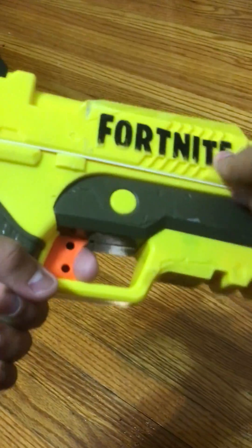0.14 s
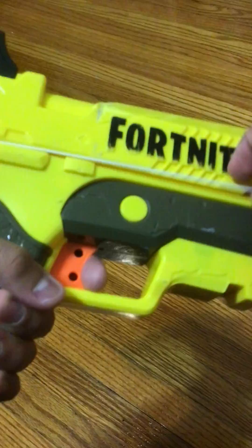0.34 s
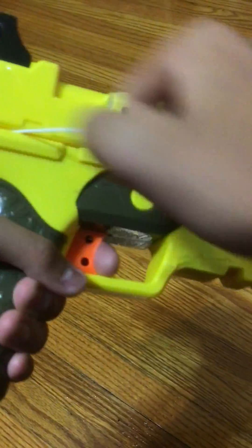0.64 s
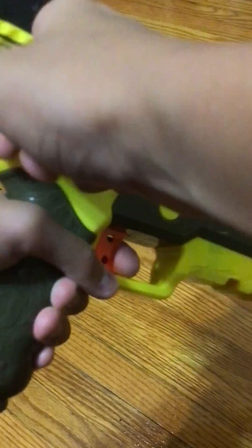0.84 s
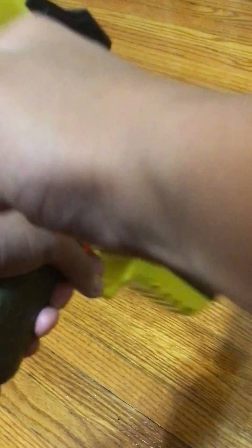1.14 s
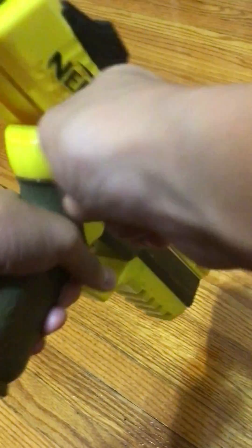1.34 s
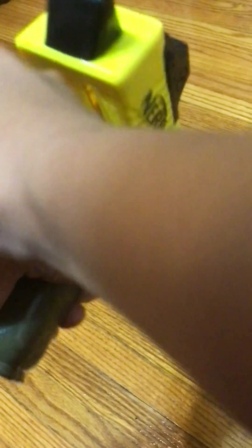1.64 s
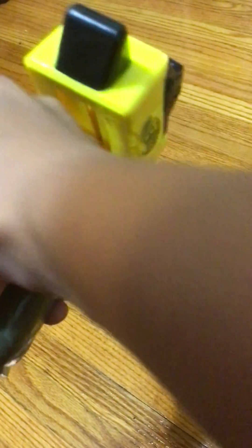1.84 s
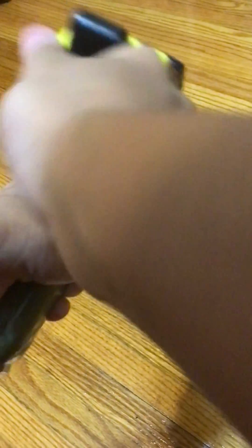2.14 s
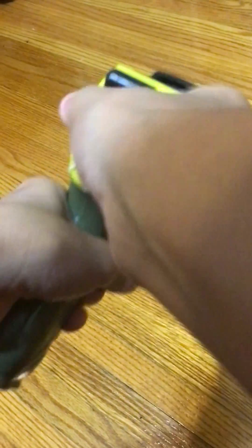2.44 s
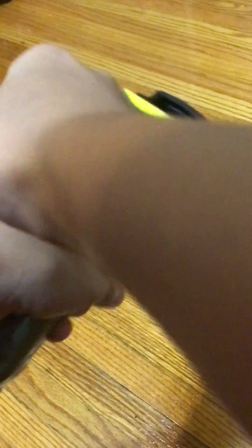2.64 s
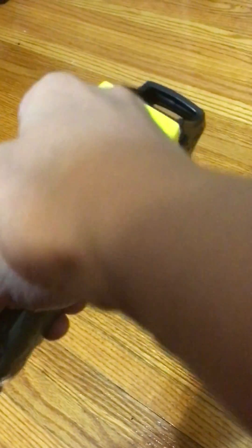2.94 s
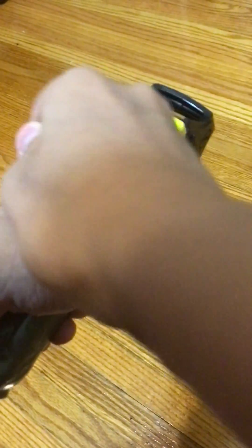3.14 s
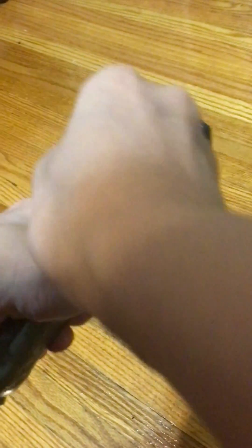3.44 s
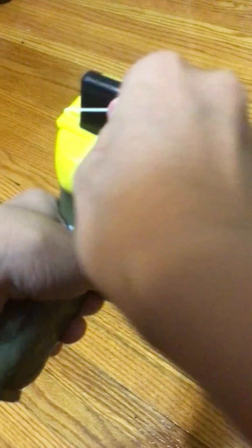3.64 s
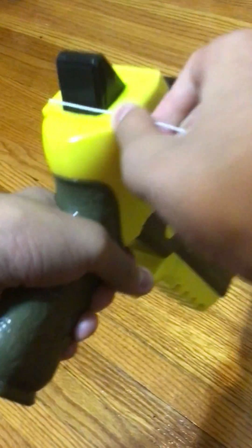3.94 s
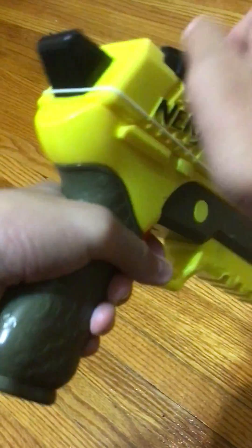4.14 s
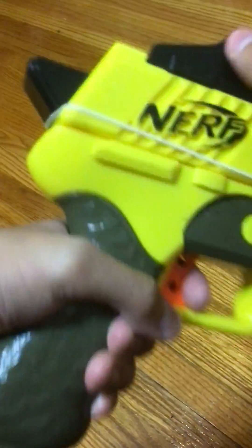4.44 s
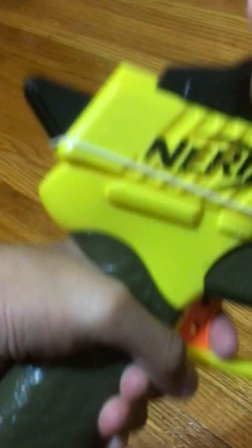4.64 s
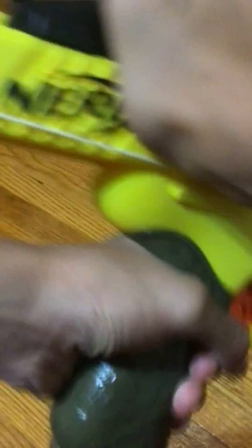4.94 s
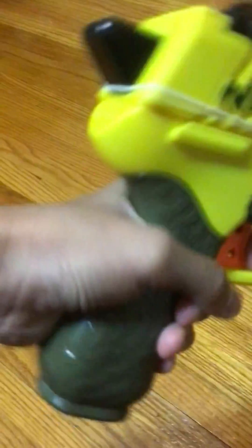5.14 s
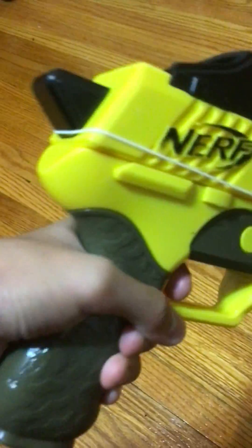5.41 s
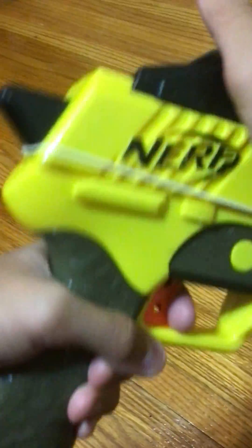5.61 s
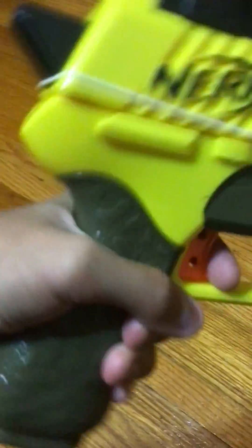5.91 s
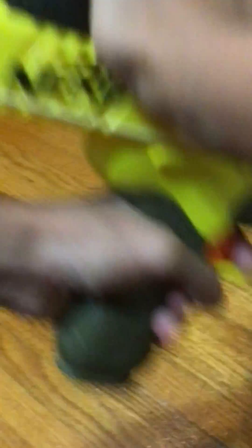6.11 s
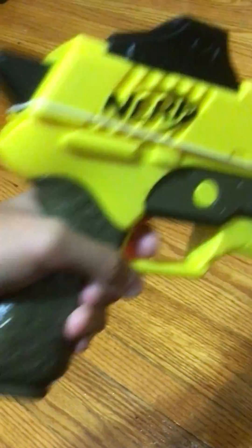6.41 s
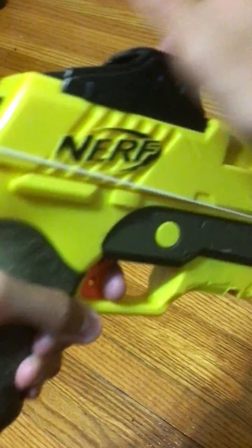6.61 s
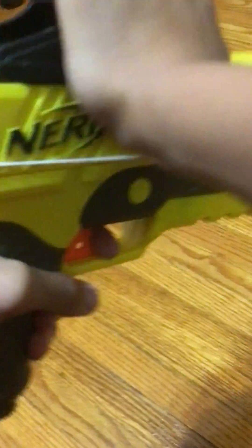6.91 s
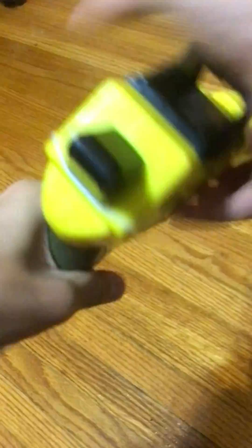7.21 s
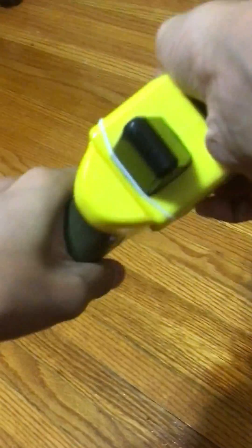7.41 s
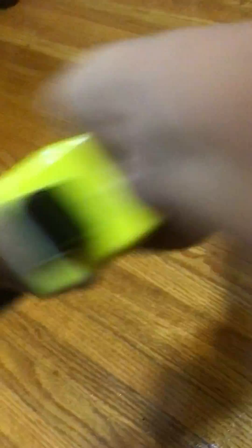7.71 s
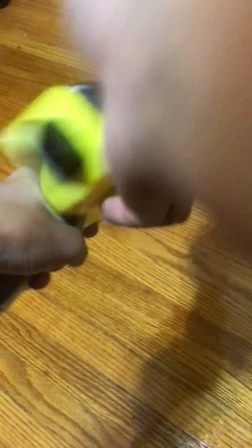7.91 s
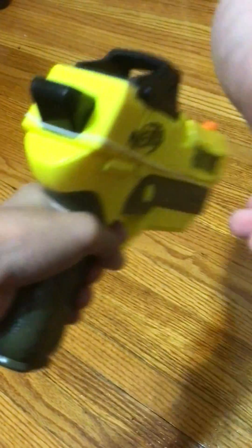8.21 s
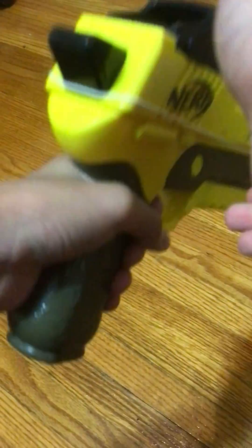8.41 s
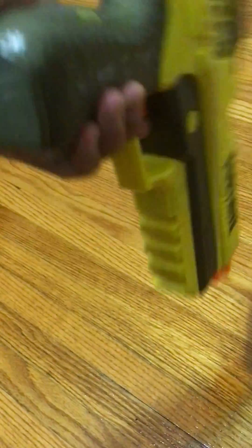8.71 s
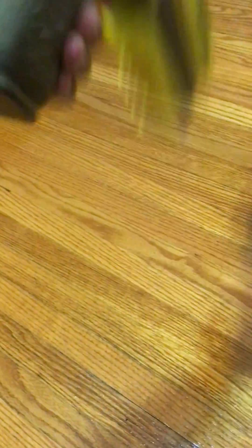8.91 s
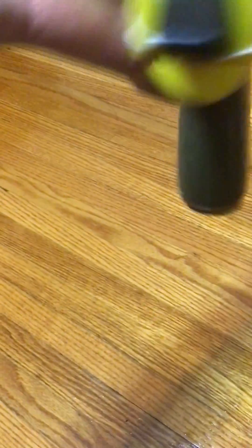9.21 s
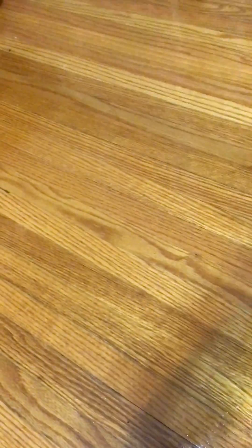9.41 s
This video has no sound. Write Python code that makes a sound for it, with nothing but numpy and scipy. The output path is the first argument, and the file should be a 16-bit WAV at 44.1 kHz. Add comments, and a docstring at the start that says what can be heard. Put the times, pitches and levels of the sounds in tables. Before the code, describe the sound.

Close to the microphone in a small room, a hollow plastic toy pistol is fidgeted with: faint ticks, finger rubs and creaks first. Then the slide is worked in quick scrapes ending in hard clacks, with a dry trigger snap and low hum after each cocking. The loudest burst is in the middle; at the end only small taps remain over faint rumble and hiss.

```python
"""A plastic toy pistol is handled, cocked and dry-fired close to a microphone in a small room.
Its hollow shell knocks at every catch and stop: noise bursts tick and clack over a swelling sine.
The slide scrapes along its rails and fingers rub the shell, both as coloured streams of tiny slips.
The plunger draws a falling tone from its air tube, the spring pings and each of four shots leaves a low hum.
Scattered reflections and a faint rumble with hiss surround it."""
import sys
import numpy as np
from scipy import signal
from scipy.io import wavfile
from scipy.ndimage import uniform_filter1d

SR = 44100
rng = np.random.default_rng(int(sys.argv[2]) if len(sys.argv) > 2 else 0)


def waveform_to_disk(signal):
    """Save audio, clipped to [-1, 1], as 16-bit WAV at the path in sys.argv[1]."""
    frames = np.transpose(np.atleast_2d(signal))
    scaled = np.clip(frames, -1, 1) * 32767
    samples = np.round(scaled).astype(np.int16)
    wavfile.write(sys.argv[1], SR, samples)


N = 421588

# Full strokes of the slide. Each row: start in seconds, stop in seconds, relative scrape level in dB,
# hiss against the body in dB, relative blow at the stop in dB, pitch of the shell in Hz,
# peak of the plunger tone in dB.
STROKES = [(2.304, 2.319, -27, -1, -13.5, 720, -42), (4.873, 4.9297, -22, 2.5, -12, 530, -21),
           (5.1, 5.1595, -20, -4, -6.5, 500, -16), (6.0, 6.0506, -24, 2, -11.5, 640, -21),
           (6.182, 6.2414, -20, -3.5, -9.5, 550, -22), (7.727, 7.7687, -22, 1, -12.5, 830, -34),
           (7.905, 7.9753, -26.5, -1, -8.5, 800, -17.5)]
# Dry shots. Each row: time in seconds, relative level in dB, pitch of the shell in Hz,
# flight of the plunger in seconds, relative hum level in dB.
SHOTS = [(2.8863, -8, 750, .0151, -16), (5.3872, -9, 640, .0229, -27), (6.4547, -11, 567, .0217, -24),
         (8.3589, -10, 720, .0225, -20)]
# Body of the plastic rubbing on its rails. Each row: frequency in Hz, relative level in dB.
RAIL = [(120, -33), (380, -16), (540, 1.5), (800, 0), (1100, -3), (1400, -5.5), (2000, -12), (4000, -21.5),
        (9000, -35.5)]
# Hiss of the scraping plastic. Each row: frequency in Hz, relative level in dB.
SCRAPE = [(800, -19), (1400, -1.5), (2400, 1.5), (4500, 0), (6500, -1), (8200, -4.5), (11000, -2.5),
          (15500, -9.5)]

# The plunger follows the stop of a stroke by this time; a thud precedes its tone by as much.
PLUNGER_LAG_S = .007


def amp(db):
    """Decibels to gain."""
    return 10 ** (np.asarray(db) / 20)


def unit(x):
    """Scales to an rms of one."""
    return x / np.sqrt(np.mean(x ** 2) + 1e-20)


def read(points, hz):
    """Reads a spectrum on a log-frequency axis."""
    f, value = np.transpose(points)
    return np.interp(np.log(hz + 1), np.log(f), value)


def add(mix, s, sound):
    """Mixes a sound in at s seconds."""
    part = mix[max(round(s * SR), 0):][:len(sound)]
    part += sound[:len(part)]


def impulse(points, size=2048):
    """Causal impulse response of unit energy with the given spectrum."""
    log_gain = np.log(amp(read(points, abs(np.fft.fftfreq(size, 1 / SR)))))
    # minimum phase puts the energy as early as the spectrum allows
    spectrum = np.exp(np.conj(signal.hilbert(log_gain)))
    h = np.fft.ifft(spectrum).real[:size // 2]
    return h / np.linalg.norm(h)


def colour(x, response):
    """Passes x through an impulse response."""
    return signal.oaconvolve(x, response)[:len(x)]


def swelling(t, swell):
    """Envelope that peaks at one after the swell time in seconds, then dies away."""
    return t / swell * np.exp(1 - t / swell)


def contact(t, decay=.003, rise=0.001, rattle_db=-15, rattle_decay=0.014, chatter_db=4):
    """Plastic on plastic: a burst of tiny impacts, then a fainter, uneven buzz of loose parts."""
    slow_noise = unit(uniform_filter1d(rng.standard_normal(len(t)), size=90))
    chatter = amp(chatter_db * slow_noise)
    rattle = amp(rattle_db) * np.exp(-t / rattle_decay) * chatter
    envelope = (1 - np.exp(-t / rise)) * (np.exp(-t / decay) + rattle)
    burst = envelope * rng.standard_normal(len(t))
    # every burst carries the energy of its envelope
    return burst * np.linalg.norm(envelope) / np.linalg.norm(burst)


def friction(slips_per_s, spread_db, smooth):
    """Tiny slips of very unequal size over a smooth hiss."""
    at = np.flatnonzero(rng.random(N) < slips_per_s / SR)
    hiss, slips = rng.standard_normal(N), np.zeros(N)
    size_db = spread_db * np.minimum(rng.exponential(1, N)[at], 4)
    slips[at] = np.sign(hiss[at]) * amp(size_db)
    return unit(unit(slips) + smooth * hiss)


def clicks(tick_db=0.77, clack_db=0.12, shell_db=-3.5, knock_db=-3.3, swell=0.0027, shell_hz=660, follow=.6):
    """Each contact ticks, clacks in the stiff walls and knocks in the hollow shell."""
    # Colours of the sharp tick, the wall clack and the shell, the last as it is for a knock at shell_hz.
    # Each row: frequency in Hz, relative level in dB.
    tick_colour = [(1500, -23.5), (3000, -10), (4000, 1), (5500, 0.5), (6800, 0.5), (8200, -3.5),
                   (10600, 3), (12500, -4), (14000, -1), (15500, -12)]
    clack_colour = [(300, -31), (700, -8), (1100, -3.5), (1380, 5), (1750, 0.5), (2050, 0), (2400, 1),
                    (3100, -5), (4000, -6), (6500, -19)]
    shell_colour = [(100, -31.5), (200, -10.5), (320, -9.5), (420, -6.5), (530, 1.5), (640, -1.5),
                    (760, 0.5), (1000, -8), (1400, -16.5), (3000, -38)]

    ticks, clacks, knocks = np.zeros((3, N))
    t = np.arange(SR // 20) / SR
    for s, high_db, mid_db, low_db, hz in contacts():
        add(ticks, s, amp(high_db + tick_db) * contact(t, decay=0.0024))
        add(clacks, s, amp(mid_db + clack_db) * contact(t, decay=0.0032))
        # the pitch of the shell depends on the grip and on where the slide stands
        shell = impulse(np.array(shell_colour) * [(hz / shell_hz) ** follow, 1])
        hollow = amp(shell_db) * colour(contact(t, decay=.005), shell)
        # its main resonance needs a cycle or two to swell
        ring = amp(knock_db) * swelling(t, swell) * np.sin(2 * np.pi * hz * t)
        add(knocks, s, amp(low_db) * (hollow + ring))
    return colour(ticks, impulse(tick_colour)) + colour(clacks, impulse(clack_colour)) + knocks


def contacts():
    """Every meeting of plastic parts, as (s, tick dB, clack dB, knock dB, pitch Hz), levels relative."""
    # Single catches and knocks of the parts. Each row: time in seconds, relative tick level in dB,
    # relative clack level in dB, relative knock of the shell in dB, pitch of that knock in Hz.
    blows = [(0.011, -43.5, -44, -39, 650), (0.054, -37.0, -42.5, -41.5, 515),
             (0.1146, -27.5, -34.5, -40.0, 1055), (0.233, -49.5, -46.0, -47.5, 720),
             (0.331, -47.5, -45.0, -34.5, 690), (0.346, -51, -47, -42, 665),
             (0.444, -33.0, -39, -38.5, 565), (0.587, -21.0, -26, -37.0, 1250),
             (0.687, -34.5, -38.0, -42.5, 695), (0.706, -34.5, -37.5, -46.0, 885),
             (0.774, -57, -50, -41, 1055), (0.924, -42.0, -48.5, -51.0, 594),
             (0.9574, -25.5, -32.0, -38.5, 616), (1.064, -64.0, -41.5, -40.5, 515),
             (1.099, -64.0, -50.0, -40.0, 560), (1.256, -42, -53, -58, 835),
             (1.297, -44.0, -46.5, -46.5, 560), (1.329, -51.0, -40.5, -33.0, 1035),
             (1.3733, -37.5, -40.5, -37.0, 755), (1.389, -49.0, -35.5, -32.5, 1030),
             (1.4506, -35.5, -38.5, -34.5, 1045), (1.491, -52.5, -49.5, -37.5, 1045),
             (1.532, -36.5, -36.5, -32.0, 750), (1.699, -37.5, -42.0, -31.0, 770),
             (1.719, -44.5, -35.5, -27.0, 755), (1.899, -37.5, -54.5, -50.5, 955),
             (1.9395, -34.0, -41.0, -34.0, 995), (2.003, -39.0, -37.0, -30.0, 1095),
             (2.082, -26.0, -25.0, -25.0, 1115), (2.107, -47.0, -40.0, -28.5, 1000),
             (2.15, -33.5, -34.0, -26.5, 650), (2.213, -46.0, -36.5, -32.0, 580),
             (2.2957, -20.5, -22.5, -23.5, 830), (2.334, -25.0, -23.5, -24.5, 640),
             (2.507, -26.0, -28.5, -26.0, 575), (2.776, -46.5, -46.0, -36.0, 510),
             (2.8185, -40.5, -39.5, -49.5, 1265), (3.222, -44.0, -47.0, -60.0, 640),
             (3.385, -42.5, -40.5, -49.0, 835), (3.4516, -45.5, -30.0, -31.5, 575),
             (3.568, -55.5, -36.5, -41.0, 905), (4.041, -51.0, -47.0, -43.0, 616),
             (4.0886, -17.0, -24.0, -32.0, 850), (4.125, -23.0, -27.0, -23.0, 825),
             (4.1654, -27.0, -31.5, -40.5, 560), (4.2916, -27.0, -35.0, -37.0, 480),
             (4.3505, -54.0, -34.0, -30.0, 450), (4.397, -28.0, -37.5, -33.5, 520),
             (4.4707, -38.0, -55.5, -49.0, 610), (4.549, -30.5, -39.5, -43.0, 720),
             (4.569, -19.5, -24.5, -18.0, 520), (4.7247, -39.5, -31.0, -33.0, 545),
             (4.7785, -25.0, -30.5, -31.0, 795), (4.7885, -21.0, -19.0, -10.0, 585),
             (4.8135, -31.5, -40.0, -32.0, 605), (4.868, -27.5, -32.5, -35.0, 715),
             (4.8888, -14.0, -17.0, -15.0, 545), (4.9087, -11.0, -17.5, -14.5, 575),
             (4.9424, -18.0, -22.5, -17.5, 710), (5.031, -30.0, -35.0, -29.0, 980),
             (5.102, -23.0, -22.0, -21.0, 1005), (5.6506, -37.0, -46.5, -48.5, 530),
             (5.7174, -24.0, -20.0, -17.0, 605), (5.9045, -32.0, -39.5, -36.5, 505),
             (5.9215, -22.0, -25.0, -14.5, 630), (6.0097, -18.5, -26.0, -21.5, 590),
             (6.0302, -12.5, -16.0, -15.0, 530), (6.0624, -16.0, -24.5, -13.0, 960),
             (6.0911, -22.5, -23.0, -15.0, 820), (6.1674, -32.5, -34.0, -37.5, 725),
             (6.7655, -32.5, -37.5, -43.0, 465), (6.8234, -23.5, -26.5, -22.5, 750),
             (6.931, -40.0, -55.0, -63.5, 725), (6.994, -49.5, -44.5, -34.0, 535),
             (7.043, -42.5, -40.5, -34.5, 535), (7.226, -49.0, -38.5, -39.0, 540),
             (7.3317, -18.0, -16.0, -11.5, 570), (7.578, -52.5, -40.0, -44.5, 680),
             (7.647, -30.5, -27.0, -28.0, 530), (7.7154, -20.0, -20.0, -23.5, 850),
             (7.7348, -17.5, -15.0, -20.5, 850), (7.941, -23.0, -22.0, -14.5, 1035),
             (8.5864, -42.0, -44.5, -51.0, 485), (8.7276, -36.5, -34.5, -37.5, 635),
             (8.738, -39, -46, -43, 500), (8.8568, -28.0, -36.0, -43.0, 560),
             (8.977, -43.5, -50.5, -50.5, 650), (9.122, -45.0, -49.0, -49.5, 515),
             (9.3696, -41.5, -34.5, -47.0, 710), (9.4185, -33.0, -40.0, -41.0, 515),
             (9.4314, -39.0, -36.0, -29.0, 490), (9.507, -35.5, -43.5, -40.0, 695),
             (9.5407, -24.5, -32.5, -26.5, 1025)]
    return list(blows) + stop_contacts() + shot_contacts() + grip_taps()


def stop_contacts(latch_s=.0085, latch_db=-2.5, latch_knock_db=-9, clack_db=-3.5, stop_knock_db=-4):
    """A light latch snaps with little knock just before the slide hits its stop."""
    rows = []
    for _, stop, _, _, db, hz, _ in STROKES:
        latch = (stop - latch_s, db + latch_db, latch_knock_db)
        for s, level, knock_db in latch, (stop, db, stop_knock_db):
            rows.append((s, level, level + clack_db, level + knock_db, hz))
    return rows


def shot_contacts(clack_db=-4.5, knock_db=0, rebound_s=.0065, rebound_db=-5.5, landing_db=-2, landing_hz=560):
    """In every shot the catch lets go and rebounds, then the plunger lands with a knock at landing_hz."""
    rows = []
    for s, db, hz, flight, _ in SHOTS:
        release = (0, db, hz)
        rebound = (rebound_s, db + rebound_db, hz)
        landing = (flight, db + landing_db, landing_hz)
        for delay, level, pitch in release, rebound, landing:
            rows.append((s + delay, level, level + clack_db, level + knock_db, pitch))
    return rows


def grip_taps(taps_per_s=9, tick_db=-2, clack_db=-1, knock_db=5, spread_db=8, low_hz=480, high_hz=1100):
    """The shifting grip gives faint taps at random times, louder where the fingers press harder."""
    rows = []
    count = round(taps_per_s * N / SR)
    for when, sharpness, force, place in rng.random(size=(300, 4))[:count]:
        s = when * N / SR
        db = pressure_db(s) + spread_db * force
        tick = db + tick_db - spread_db * sharpness
        rows.append((s, tick, db + clack_db, db + knock_db, low_hz + (high_hz - low_hz) * place))
    return rows


def slide(speed_up_db=8, overrun_s=.004):
    """The slide grinds along its rails, harder as it gathers speed, and overruns the stop a little."""
    # Other short scrapes, before a catch, after a stop or during handling. Each row: start in seconds,
    # end in seconds, relative scrape level in dB, hiss against the body in dB.
    short_scrapes = [(.96, .992, -43, 0), (1.942, 1.968, -44, 1), (2.077, 2.318, -39, -7.5),
                     (2.322, 2.342, -25, -3), (4.561, 4.592, -32, -1), (4.93, 4.975, -27, -3),
                     (5.676, 5.726, -36, 1), (6.06, 6.105, -28, -2), (6.794, 6.827, -32, -4),
                     (7.609, 7.724, -35, -2), (7.978, 8.005, -26, 3)]

    body, hiss = np.zeros(N), np.zeros(N)
    strokes = [(start, stop + overrun_s, db, hiss_db) for start, stop, db, hiss_db, *_ in STROKES]
    for start, end, db, hiss_db in strokes + list(short_scrapes):
        count = max(round((end - start) * SR), 2)
        rising_db = np.linspace(db - speed_up_db, db, count)
        force = amp(rising_db) * signal.windows.tukey(count, .3)
        add(body, start, force)
        add(hiss, start, force * amp(hiss_db))
    slips = friction(slips_per_s=1200, spread_db=5.0, smooth=0.72)
    return colour(slips * body, impulse(RAIL)) + colour(slips * hiss, impulse(SCRAPE))


def plunger(thud_db=-6, shot_tone_s=.013, shot_tone_db=-9):
    """The plunger starts with a thud; the air chamber grows as it travels, so its tone falls."""
    # Small slips of the plunger. Each row: time in seconds, peak of the tone in dB.
    small_slips = [(2.70, -42.5), (2.742, -32), (4.353, -27), (4.79, -28.5), (5.924, -33.5), (6.113, -30.5),
                   (6.182, -33), (7.846, -32), (9.432, -43)]
    # The whole pistol thuds as the plunger is set moving. Each row: frequency in Hz, relative level in dB.
    thud_colour = [(40, -20), (110, -3), (280, 0), (380, -4), (600, -25), (2000, -50)]
    # falling tones: first pitch Hz, pitch it settles towards Hz, glide time constant s, swell time s
    slip_tone, stroke_tone = (420, 170, .012, .0053), (400, 62, .0075, .0075)
    shot_tone = (290, 88, .011, .0105)

    tones, thuds = np.zeros(N), np.zeros(N)
    t = np.arange(SR // 6) / SR
    moves = [(s, db, slip_tone) for s, db in small_slips]
    moves += [(stop + PLUNGER_LAG_S, db, stroke_tone) for _, stop, *_, db in STROKES]
    moves += [(s + shot_tone_s, db + shot_tone_db, shot_tone) for s, db, *_ in SHOTS]
    for s, db, (first_hz, last_hz, glide, swell) in moves:
        hz = last_hz + (first_hz - last_hz) * np.exp(-t / glide)
        phase = 2 * np.pi * np.cumsum(hz) / SR
        add(tones, s, amp(db) * swelling(t, swell) * np.sin(phase))
        add(thuds, s - PLUNGER_LAG_S, amp(db + thud_db) * contact(t, decay=.005))
    return tones + colour(thuds, impulse(thud_colour))


def spring(rise=0.0039, pair=0.014, ping_rise=.0005, hum_delay_s=.027):
    """The released spring hums in the shell; during handling its coils ping in close pairs of tones."""
    # Modes of the hum. Each row: frequency in Hz, relative level in dB, 60 dB decay time in seconds.
    hum_modes = [(85.1, -2.5, 0.32), (180.4, 5, 0.14), (303, -12, 0.16)]
    # Pings of the coils. Each row: time in seconds, relative level in dB, pitch in Hz,
    # 60 dB decay time in seconds.
    pings = [(.445, -23, 2210, 0.04), (.589, -16.5, 2350, 0.045), (0.962, -19, 9300, 0.016),
             (2.005, -44, 6150, .02), (2.085, -39, 6100, .02), (3.568, -44, 6420, 0.028)]

    out, t = np.zeros(N), np.arange(SR // 2) / SR
    modes = sum(amp(db - 60 * t / t60) * np.sin(2 * np.pi * hz * t) for hz, db, t60 in hum_modes)
    hum = (1 - np.exp(-t / rise)) * modes
    for s, *_, db in SHOTS:
        add(out, s + hum_delay_s, amp(db) * hum)
    for s, db, hz, t60 in pings:
        envelope = amp(db - 60 * t / t60) * (1 - np.exp(-t / ping_rise))
        upper_tone = 0.38 * np.cos(2 * np.pi * hz * (1 + pair) * t)
        add(out, s, envelope * (np.sin(2 * np.pi * hz * t) + upper_tone))
    return out


def fingers(rub_db=-4.2, creak_db=-11, grip=1.05):
    """Fingers rub on the shell, their grip raising its pitch, and its seams creak in small ticks."""
    pressure = amp(pressure_db(np.arange(N) / SR))
    gripped_shell = impulse(np.array(RAIL) * [grip, 1])
    rub = colour(friction(slips_per_s=110, spread_db=3, smooth=.6), gripped_shell)
    seam = colour(contact(np.arange(SR // 20) / SR, decay=.001), impulse(SCRAPE))
    creak = unit(colour(friction(slips_per_s=40, spread_db=4.5, smooth=.3), seam))
    return pressure * (amp(rub_db) * rub + amp(creak_db) * creak)


def pressure_db(s):
    """How hard the fingers press at a given time."""
    # Pressure of the fingers on the shell. Each row: time in seconds, relative level in dB.
    press_points = [(0.0, -50.0), (0.22, -64.0), (0.4, -54.0), (0.7, -59.0), (1.0, -51.0), (1.21, -62.0),
                    (1.48, -45.0), (1.65, -60.0), (1.9, -55.0), (2.17, -44.0), (2.42, -59.0), (2.8, -47.0),
                    (3.2, -71.0), (3.48, -56.0), (3.8, -68.0), (4.4, -61.0), (5.07, -41.0), (5.55, -58.0),
                    (6.1, -45.0), (6.45, -55.0), (7.0, -52.0), (7.5, -60.0), (7.86, -42.0), (8.12, -67.0),
                    (8.3, -53.0), (8.6, -59.0), (9.3, -62.0), (9.55, -46.0)]
    return np.interp(s, *np.transpose(press_points))


def room(x, wet_db, build):
    """Scattered reflections build up quickly and decay by band; three diffuse tails take turns."""
    # Decay of the reverberation. Each row: frequency in Hz, 60 dB decay time in seconds.
    decay_times = [(100, 0.04), (500, 0.33), (1500, 0.3), (4000, 0.35), (9000, 0.3134), (15000, 0.27)]
    # Colour of the reverberation. Each row: frequency in Hz, relative level in dB.
    wet_colour = [(80, -13), (250, -2.5), (550, 0), (800, -1), (1500, 2.5), (5000, -0.5), (15000, 2)]

    taps = rng.standard_normal((3, SR // 2))
    hz, t, z = signal.stft(taps, SR, nperseg=256)
    z = z * amp(read(wet_colour, hz)[:, None] - 60 * t / read(decay_times, hz)[:, None])
    tails = signal.istft(z, SR)[1]
    tail_t = np.arange(tails.shape[1]) / SR
    tails = tails * (1 - np.exp(-(tail_t / build) ** 2))
    # the turns break up steady comb lines; the squares of the shares always sum to one
    turn = np.pi * (np.arange(N) / SR + np.arange(3)[:, None] / 3)
    shares = np.sqrt(2 / 3) * np.cos(turn)
    wet = sum(colour(x * share, tail / np.linalg.norm(tail)) for share, tail in zip(shares, tails))
    return amp(wet_db) * wet


def air(level_db=-58.5):
    """Steady low rumble and faint hiss of the room, as coloured noise."""
    # Background of the room. Each row: frequency in Hz, relative level in dB per Hz.
    air_colour = [(25, -14), (40, -8), (62, 2), (130, -1.5), (190, 0), (250, -6.5), (308, 1), (400, -13),
                  (450, -21), (620, -20), (970, -32.5), (3500, -35), (11600, -31), (15500, -48.5)]
    return amp(level_db) * colour(rng.standard_normal(N), impulse(air_colour, size=8192))


def scene():
    """The pistol in its room."""
    pistol = clicks() + slide() + plunger() + spring() + fingers()
    return (pistol + room(pistol, wet_db=-11.0, build=0.0055) + air())[None]


def record(dry, ceiling=.8, edge_hz=15850):
    """The microphone loses the deepest bass and rounds off the loudest peaks; then the band limit."""
    thinned = signal.sosfilt(signal.butter(6, 45, "high", fs=SR, output="sos"), dry)
    rounded = ceiling * np.tanh(thinned / ceiling)
    low_pass = signal.firwin(255, edge_hz, window=("kaiser", 8), fs=SR)
    return signal.oaconvolve(rounded, low_pass[None], "same")


dry = scene()
out = record(dry)
waveform_to_disk(out)
```